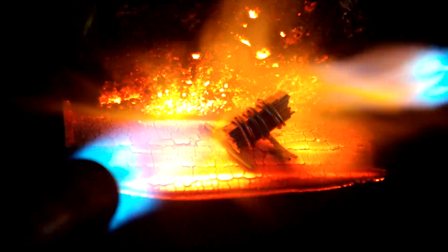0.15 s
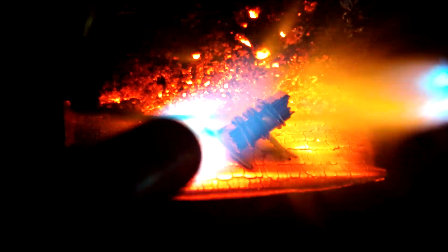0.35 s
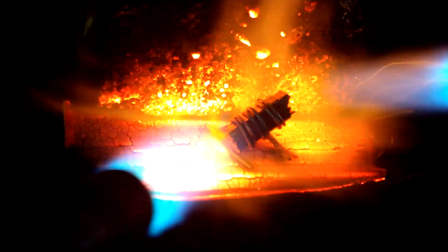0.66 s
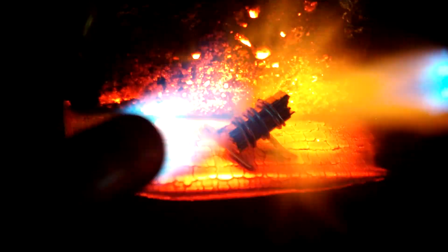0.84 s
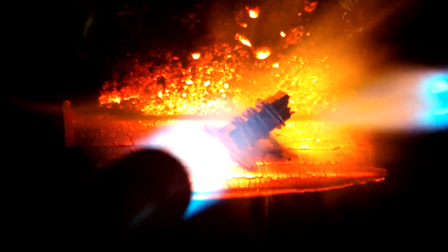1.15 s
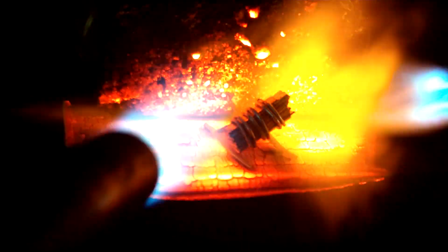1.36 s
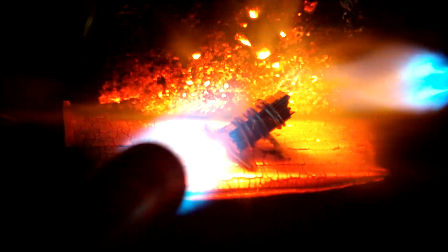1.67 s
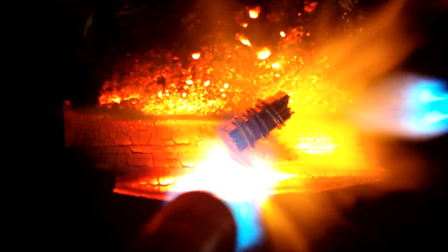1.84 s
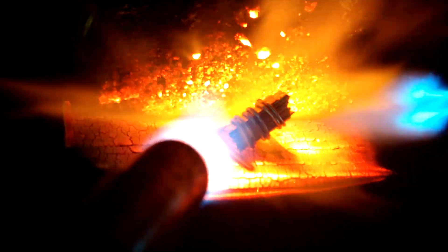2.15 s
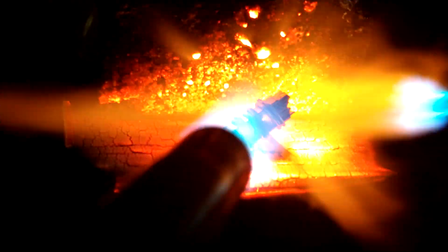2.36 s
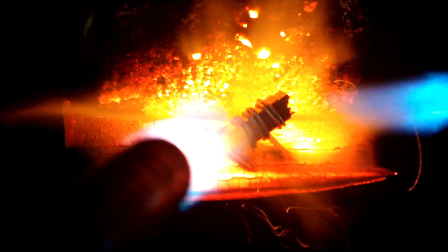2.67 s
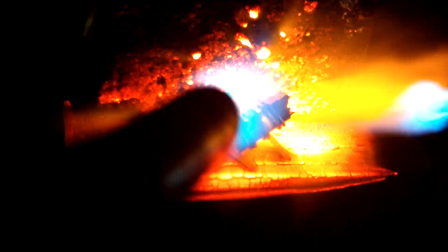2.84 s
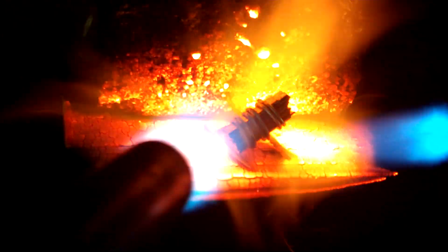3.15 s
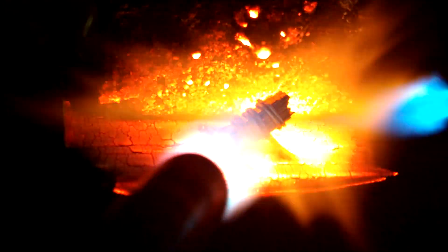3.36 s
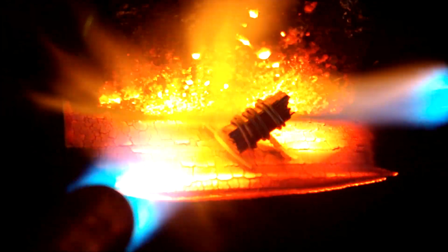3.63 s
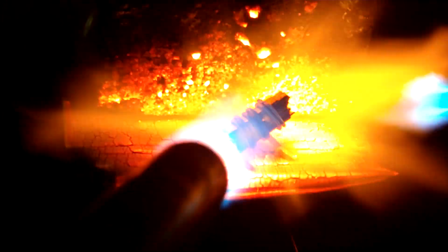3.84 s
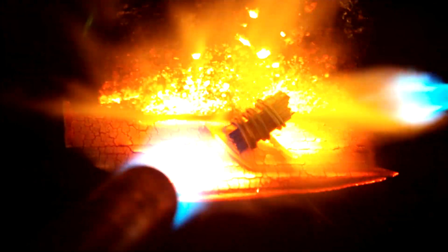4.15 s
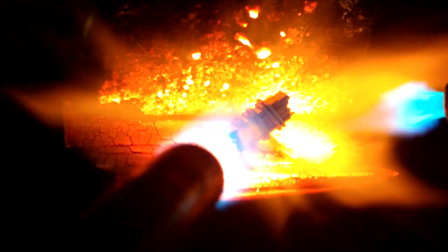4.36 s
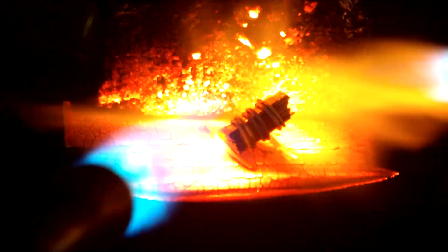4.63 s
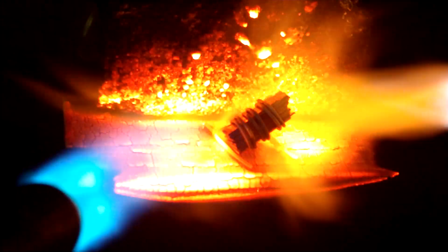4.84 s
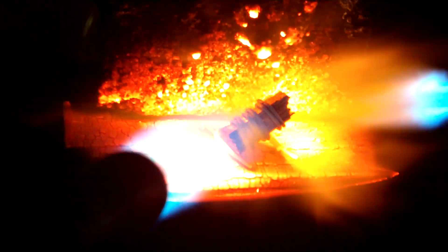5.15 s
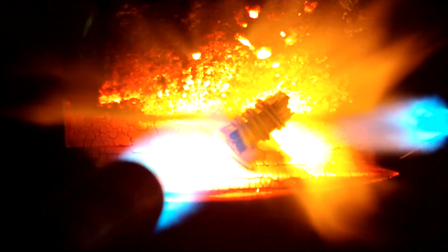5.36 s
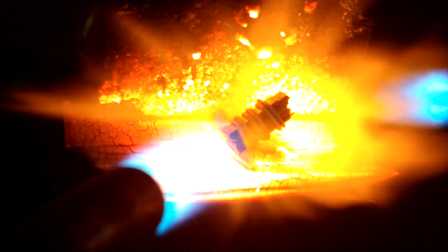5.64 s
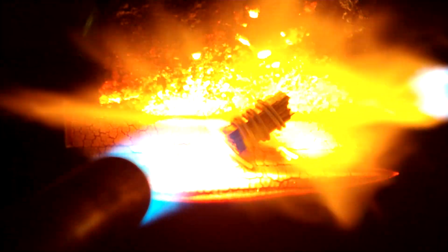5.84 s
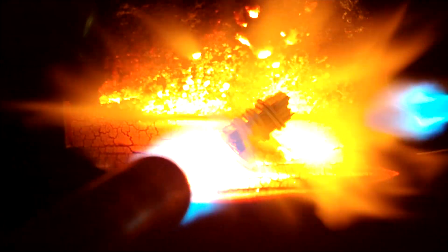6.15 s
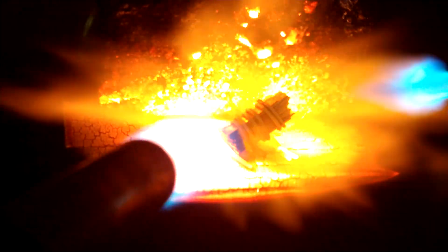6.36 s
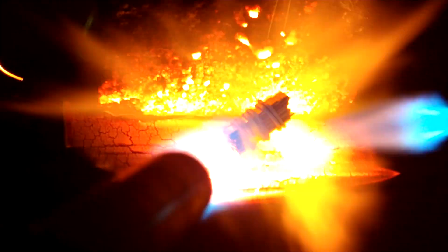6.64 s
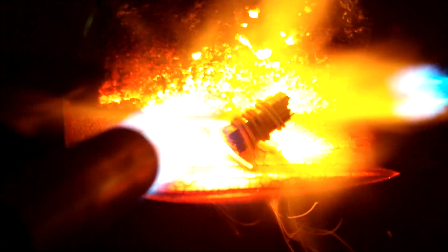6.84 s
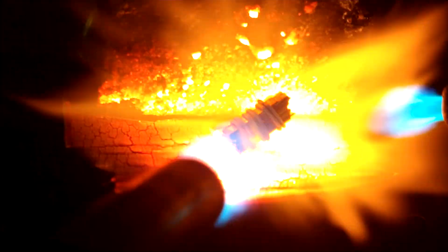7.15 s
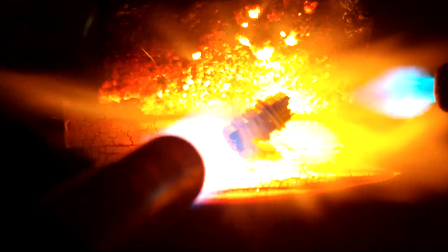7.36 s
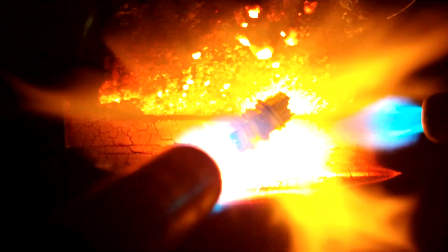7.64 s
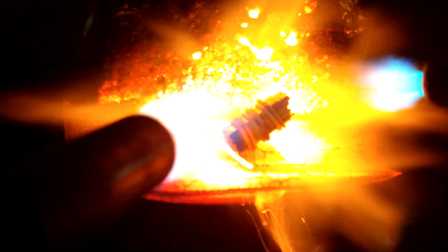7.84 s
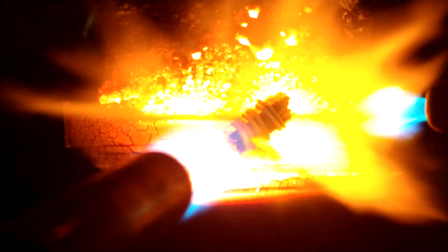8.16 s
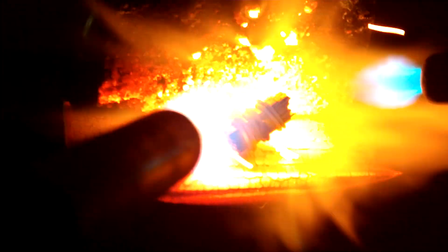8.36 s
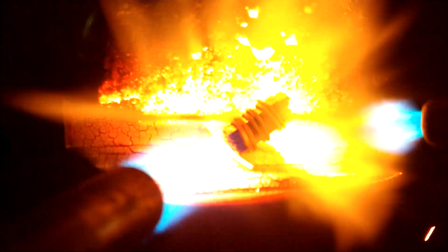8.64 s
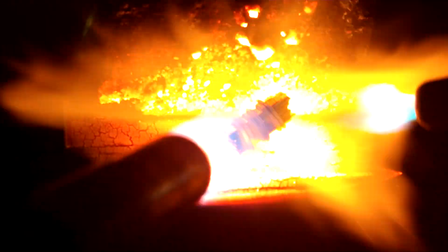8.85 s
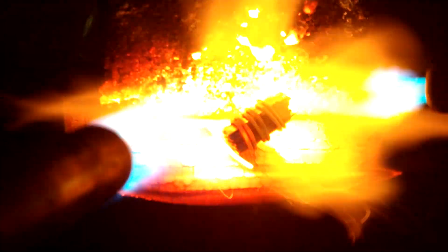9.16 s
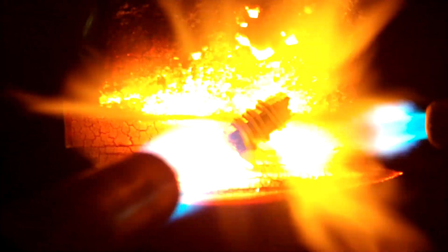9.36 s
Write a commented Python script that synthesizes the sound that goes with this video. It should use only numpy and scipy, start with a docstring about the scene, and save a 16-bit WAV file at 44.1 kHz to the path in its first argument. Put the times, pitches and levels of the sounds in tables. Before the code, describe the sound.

Two gas torches roar and hiss steadily up close, with a wavering howl that comes and goes as the flames catch the metal.

```python
"""At a charcoal block, close to the microphone, two gas torches play on a metal billet.
Their turbulent flames rumble and roar steadily in the hollow of the hearth; each time a flame
catches the work it howls for a moment. Each gas jet hisses in its own resonances.
The first second is a harder blast; midway the near torch is drawn back and eased in again."""
import sys
import numpy as np
from scipy import signal
from scipy.fft import rfft, irfft
from scipy.io import wavfile

SR = 44100
rng = np.random.default_rng(int(sys.argv[2]) if len(sys.argv) > 2 else 0)


def master_out(mix):
    """Clip the mix to full scale and print it as 16-bit PCM to the path in sys.argv[1]."""
    frames = np.transpose(np.atleast_2d(mix))
    ceiling = np.clip(frames, -1, 1)
    pcm = np.round(ceiling * 32767).astype(np.int16)
    wavfile.write(sys.argv[1], SR, pcm)


N = 418950
TIME = np.arange(N) / SR
BINS = np.fft.rfftfreq(N, 1 / SR)


def gain_of(db):
    """Decibels to amplitude."""
    return 10 ** (np.asarray(db) / 20)


def unit_rms(x):
    """Scales to an rms of 1."""
    return x / np.sqrt(np.mean(x ** 2) + 1e-20)


def curve(rows, column=1):
    """One column of a table, joined by straight lines in time."""
    columns = np.transpose(rows)
    return np.interp(TIME, columns[0], columns[column])


def swell(start_s, length_s, attack_s, release_s):
    """Attack, hold and release, from 0 to 1."""
    rise = (TIME - start_s) / attack_s
    fall = (start_s + length_s - TIME) / release_s
    return np.clip(np.minimum(rise, fall), 0, 1)


def spectrum(points):
    """Gain at every frequency, joined from a few points."""
    hz, db = np.transpose(points)
    return gain_of(np.interp(np.log(BINS + 1), np.log(hz + 1), db))


def turbulence(colour):
    """Random pressure of rms 1 with the given colour."""
    return unit_rms(irfft(rfft(rng.standard_normal(N)) * colour, N))


def drift(rate_hz):
    """Random wander of rms 1, up to about the given rate."""
    return turbulence(1 / (1 + (BINS / rate_hz) ** 2))


def gas_noise(modes, level_db=0):
    """Gas rushing through a set of steep-sided resonances."""
    power = sum(gain_of(db) ** 2 / (1 + 2 * ((BINS - hz) / width) ** 2) ** 2 for hz, width, db in modes)
    return turbulence(np.sqrt(power)) * gain_of(level_db)


def notch(x, hz, width_hz, depth):
    """Takes a share of one band out of the sound; the band may move."""
    carrier = np.exp(2j * np.pi * np.cumsum(hz * np.ones(N)) / SR)
    pole = np.exp(-np.pi * width_hz / SR)
    band = 2 * (carrier * signal.lfilter([1 - pole], [1, -pole], x / carrier)).real
    return x - np.clip(depth, 0, 1) * band


def blast(hold_s=0.89, fall_s=0.5):
    """Extra gas pressure: 1 in the opening blast, sinking to 0 as the valve is eased."""
    return np.exp(-np.maximum(TIME - hold_s, 0) / fall_s)


def drawn_back(start_s=4.56, out_s=0.22, return_s=1.83):
    """How far the near torch is from the work, from 0 to 1."""
    return swell(start_s, out_s + return_s, out_s, return_s)


# The free flame, outside the hearth. Each row: centre in Hz, width in Hz, relative level in dB.
FREE_FLAME_BANDS = [(345, 75, 0)]

def whoosh(level_db=-39):
    """Soft rush of the free flame while the near torch is farthest back."""
    return gas_noise(FREE_FLAME_BANDS, level_db) * drawn_back() ** 4


# The broad low end around the block. Each row: frequency in Hz, relative level in dB.
RUMBLE_SPECTRUM = [(20, -35), (62, -16), (90, -6.5), (130, -1.5), (200, -8.5), (320, -20.5), (1000, -73.5)]
# Resonances of that space. Each row: centre in Hz, width in Hz, relative level in dB.
BOOM_BANDS = [(100.0, 15, -7.5), (123, 13, -7.5), (154.2, 15.7, 0.5), (179.6, 19, -4.5), (221, 39, -5.5),
              (283, 26, -8), (355, 20.0, -9)]

def rumble(broad_db=-43, boom_db=-32, blast_db=0.5, howling_db=-1.3, waver_db=0.06):
    """The large eddies of the flames boom in the space around the block."""
    broad = gain_of(broad_db) * turbulence(spectrum(RUMBLE_SPECTRUM))
    boom = gas_noise(BOOM_BANDS, boom_db)
    change_db = blast_db * blast() + howling_db * howling() + waver_db * drift(rate_hz=2.5)
    return (broad + boom) * gain_of(change_db)


# The sizzle at the billet. Each row: centre in Hz, width in Hz, relative level in dB.
SIZZLE_BANDS = [(3840, 120, -1), (4460, 150, 2), (5130, 100, -14)]
# The jet's passes over it. Each row: start in seconds, length in seconds, level in dB.
GRAZE_PASSES = [(2.05, .4, -38), (2.45, .42, -29.5), (2.95, 0.41, -26), (3.9, 0.62, -34)]

def graze(edge_s=0.14):
    """Thin sizzle each time the near jet brushes the billet."""
    strength = sum(gain_of(db) * swell(start_s, length_s, edge_s, edge_s)
                   for start_s, length_s, db in GRAZE_PASSES)
    return gas_noise(SIZZLE_BANDS) * strength


# The nozzle's resonances. Each row: centre in Hz, width in Hz, relative level in dB.
NOZZLE_BANDS = [(1028.0, 250, -5), (3866, 110, -1), (6550, 440, -5)]
# Its whistle coming and going. Each row: time in seconds, base level in dB.
WHISTLE_LEVELS = [(0, -38), (.35, -24.5), (1.5, -25), (1.85, -28), (2.1, -26.5), (3.2, -24.5), (4.2, -31),
                  (5.6, -24.5), (6.6, -45.5), (7.9, -33.5), (9.5, -36.5)]

def whistle(drawn_db=-17, flutter_db=0.9):
    """The nozzle whistles unsteadily and fades while the near torch is drawn back."""
    level_db = curve(WHISTLE_LEVELS) + drawn_db * drawn_back() ** 2 + flutter_db * drift(rate_hz=14)
    return gas_noise(NOZZLE_BANDS, level_db)


# The jet farther from the microphone. Each row: centre in Hz, width in Hz, relative level in dB.
FAR_JET_BANDS = [(3473, 350, -1), (4150, 470, -1), (4690, 240, -4.5), (5730, 348.0, -7), (6520, 360, -0.8),
                 (6930, 350, -6), (7505, 570, 0.0)]
# Its hiss as it is moved about. Each row: time in seconds, base level in dB.
FAR_JET_LEVELS = [(0, -24), (1.8, -26.5), (3.6, -25.5), (4.4, -25), (6.0, -27.5), (6.8, -24.5),
                  (7.3, -25.5), (9.5, -25.5)]

def far_jet(blast_db=1, drawn_db=-9):
    """The far torch hisses harder in the blast and slackens while the near one is drawn back."""
    level_db = curve(FAR_JET_LEVELS) + blast_db * blast() + drawn_db * drawn_back() ** 2
    return gas_noise(FAR_JET_BANDS, level_db)


# The jet nearer the microphone. Each row: centre in Hz, width in Hz, relative level in dB.
NEAR_JET_BANDS = [(2160, 230, -1), (3237, 110.0, -1.5), (4754, 78, -1.5), (4990, 780, -5.5),
                  (5360, 273.0, -2.5), (5740, 370, -9), (6470, 371.0, -1)]
# Its hiss as it is moved about. Each row: time in seconds, base level in dB.
NEAR_JET_LEVELS = [(0, -21), (.9, -25), (1.2, -28), (1.8, -30), (2.1, -27), (2.9, -25), (3.6, -29),
                   (4.3, -31.5), (7.6, -33), (9.5, -30.5)]
# Its rush under pressure. Each row: centre in Hz, width in Hz, relative level in dB.
RUSH_BANDS = [(150, 60, -6.5), (543, 68, -4), (707, 73, 1.5), (970, 170, -1), (1285, 240, -4.5),
              (1940, 120, -12), (2310, 83, -5.5), (2556, 135, -9), (3163, 170, -5), (5460, 630, -8),
              (6400, 255, -2.5), (6570, 380, -9.5), (7440, 790, -9)]

def near_jet(drawn_db=9, rush_db=-32.5, blast_db=16, fade_db_per_s=0.3):
    """The near torch hisses more when clear of the work; pressure adds a coarse rush that slackens."""
    rush = gas_noise(RUSH_BANDS, rush_db + blast_db * blast() - fade_db_per_s * TIME)
    return gas_noise(NEAR_JET_BANDS, curve(NEAR_JET_LEVELS) + drawn_db * drawn_back()) + rush


# The band cancelled at the microphone. Each row: time in seconds, centre in Hz, depth from 0 to 1.
REFLECTION_NOTCH = [(0, 4440, 0.2), (1.0, 4430, .42), (1.4, 4124, 0.4), (3.3, 4140, 0.2),
                    (4.55, 3740, 0.23), (4.9, 3800, 0.1), (5.35, 4320, 0.3), (6.0, 4500, 0)]

def hiss(waver_db=0.43):
    """Both hand-held jets; a reflection off the block thins one band, which moves with the torch."""
    jets = near_jet() + far_jet() + whistle() + graze()
    jets *= gain_of(waver_db * drift(rate_hz=4))
    return notch(jets, hz=curve(REFLECTION_NOTCH), width_hz=350, depth=curve(REFLECTION_NOTCH, column=2))


# The drone from inside the hearth. Each row: time in seconds, level in dB.
DRONE_LEVELS = [(0, -25), (2.6, -25.5), (3.6, -29), (4.4, -24.5), (5.6, -28.5), (6.2, -22), (7.1, -26),
                (9.5, -27.5)]

def drone(hz=780, jitter_hz=34):
    """The flame sustains the hearth's main resonance: slow to swell, restless in pitch."""
    phase = 2 * np.pi * np.cumsum(hz + jitter_hz * drift(rate_hz=45)) / SR
    return unit_rms(np.cos(phase)) * gain_of(curve(DRONE_LEVELS))


HOWL_ATTACK_S, HOWL_RELEASE_S = 0.064, 0.08
# A flame catches the work, close by. Each row: start in seconds, length in seconds, midway pitch in Hz,
# glide in Hz per second, relative level in dB, share of pure tone from 0 to 1.
FLAME_CATCHES = [(0.04, .2, 940, 300, -22.5, .4), (0.22, 0.547, 864, 104, -21, .35),
                 (0.74, .34, 810, -250, -19.5, 0.48), (1.26, 0.24, 820, -1, -24.5, .4),
                 (1.99, .33, 855, 448, -21, .55), (2.439, .42, 953, 250.5, -23, 0.61),
                 (2.78, .4, 996, 50, -22.5, .65), (3.08, .55, 1000, 30.5, -19, .75),
                 (3.603, .54, 1000, 197, -24.5, .35), (4.374, 0.33, 1020, 0, -22.5, 0.42),
                 (5.131, .69, 1044, -50, -21, .6), (6.24, .71, 1036, -51, -21.3, .62),
                 (7.248, 0.79, 1017, -2.5, -21.5, .55), (8.06, .25, 827, 98, -21.5, .55),
                 (8.357, .24, 1020, -400, -20.5, .6), (8.55, 0.158, 820, 0, -20.5, 0.8),
                 (8.689, .18, 1070, 0, -18.5, .6), (8.91, .22, 1075, 0, -19.5, .6),
                 (9.069, .12, 900, -3000, -22, .6), (9.16, 0.18, 795, 2, -25, 0.5),
                 (9.307, .22, 1055, -81, -23.5, .55)]

def howl(level_db=-1.15, width_hz=65, jitter_hz=19, wander_hz=48, sag_hz=69.5):
    """Eddies shed at the work: a fuzzy, gliding band; the purer its tone, the less it wanders."""
    jitter = jitter_hz * drift(rate_hz=35)
    wander = wander_hz * drift(rate_hz=12)
    fuzz = drift(width_hz) + 1j * drift(width_hz)
    sound = np.zeros(N)
    for start_s, length_s, hz, glide, db, pure in FLAME_CATCHES:
        strength = swell(start_s, length_s, HOWL_ATTACK_S, HOWL_RELEASE_S)
        on = strength > 0
        pitch = hz + glide * (TIME[on] - start_s - length_s / 2)
        pitch -= sag_hz * (1 - strength[on])  # lower as the flame catches and lets go
        pitch += jitter[on] + (1 - pure) * wander[on]
        carrier = np.exp(2j * np.pi * np.cumsum(pitch) / SR)
        tone = carrier * (np.sqrt(2 * pure) + np.sqrt(1 - pure) * fuzz[on])
        sound[on] += gain_of(db + level_db) * strength[on] * tone.real
    return sound


def howling():
    """How firmly the flame is locked into a howl; a locked flame is less turbulent."""
    return sum(pure * swell(start_s, length_s, HOWL_ATTACK_S, HOWL_RELEASE_S)
               for start_s, length_s, *_, pure in FLAME_CATCHES)


# The hollow of the hearth, from close up. Each row: centre in Hz, width in Hz, relative level in dB.
HEARTH_BANDS = [(518.4, 106, -10), (654, 120, -10), (776, 143, -4.5), (1013, 210, -5.5), (1230, 142, -7),
                (1402, 113, -11.5), (1558, 57, -10), (1668, 126, -10.5), (1828, 208, -15),
                (2268, 303, -14.5), (2520, 92, -12.5), (2710, 83, -16.5), (3010, 620, -20.5),
                (6590, 840, -18)]

def roar(level_db=-18.5, blast_db=0.1, howling_db=-1.15):
    """Combustion noise ringing in the hearth, dipping a little under each howl."""
    return gas_noise(HEARTH_BANDS, level_db + blast_db * blast() + howling_db * howling())


def scene():
    """Flames and jets, all heard from one spot close to the block."""
    hearth = roar() + drone() + rumble() + howl() + hiss()
    # The hearth has a dead band between boom and roar; the drawn-back flame burns outside it.
    hearth = notch(hearth, hz=337, width_hz=43, depth=0.33 + 0.25 * blast())
    return (hearth + whoosh())[None]


# The microphone's bass and treble roll-off. Each row: frequency in Hz, gain in dB.
MICROPHONE_RESPONSE = [(20, -23), (50, -7), (85, -1), (7600, 0.5), (7800, -1.5), (8000, -13.5), (8220, -7),
                       (8400, -13), (8550, -23)]

def record(dry, ceiling=0.86, cutoff_hz=8549):
    """One close microphone: its colour, overload on the rare highest peaks, then the band limit."""
    coloured = irfft(rfft(dry) * spectrum(MICROPHONE_RESPONSE), N)
    clipped = np.clip(coloured, -ceiling, ceiling)
    lowpass = signal.firwin(1023, cutoff_hz, window=("kaiser", 9), fs=SR)
    return signal.oaconvolve(clipped, lowpass[None], "same")


dry = scene()
out = record(dry)
master_out(out)
```